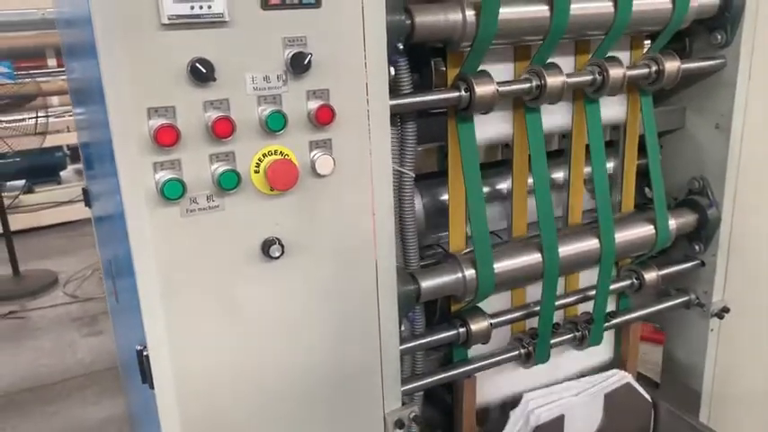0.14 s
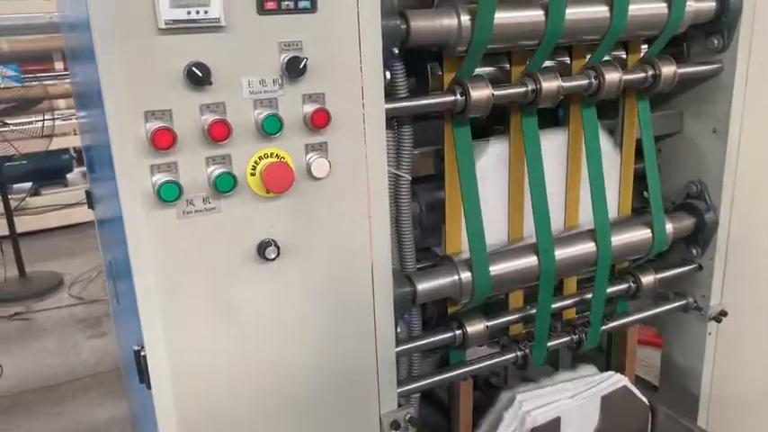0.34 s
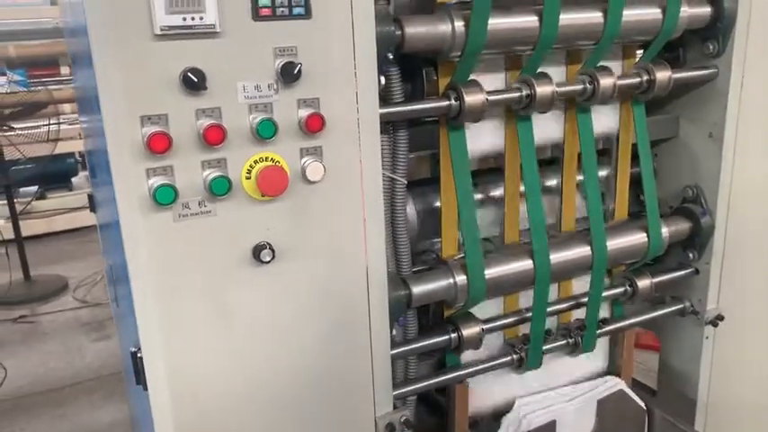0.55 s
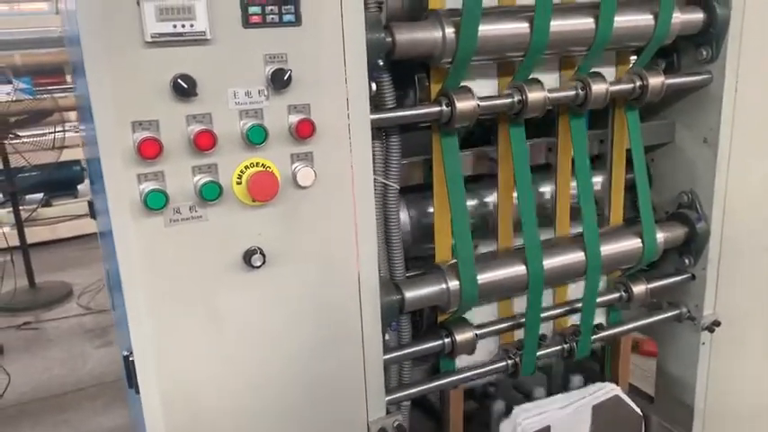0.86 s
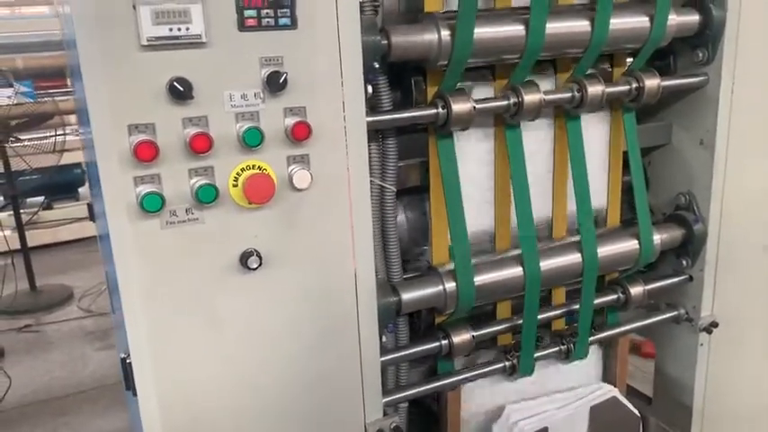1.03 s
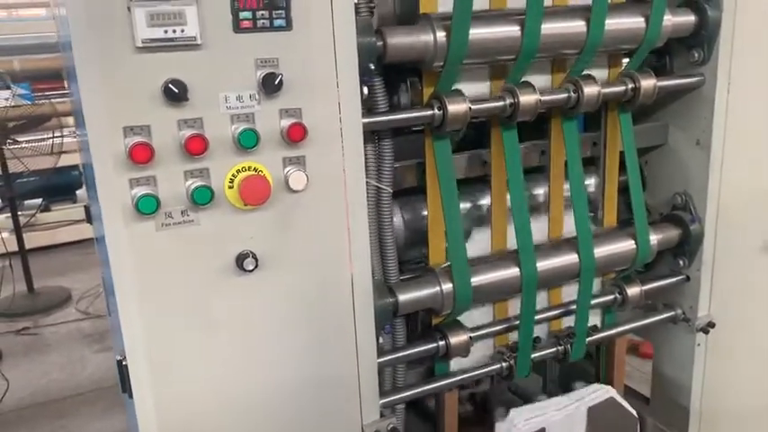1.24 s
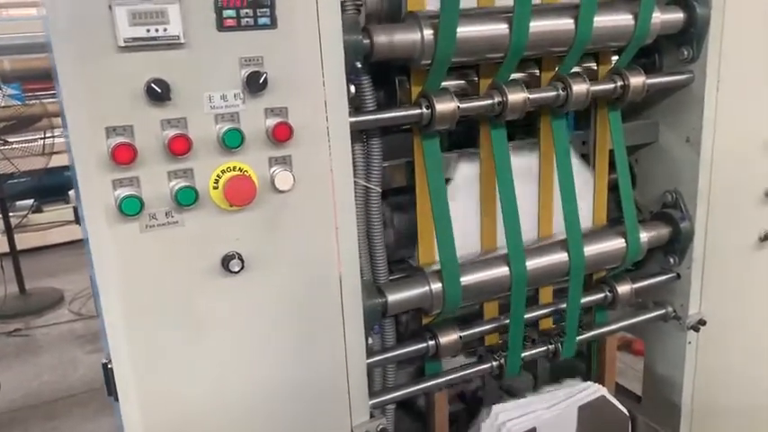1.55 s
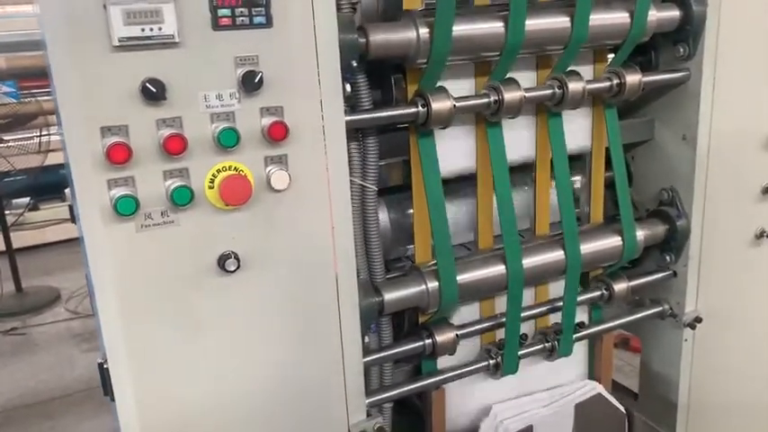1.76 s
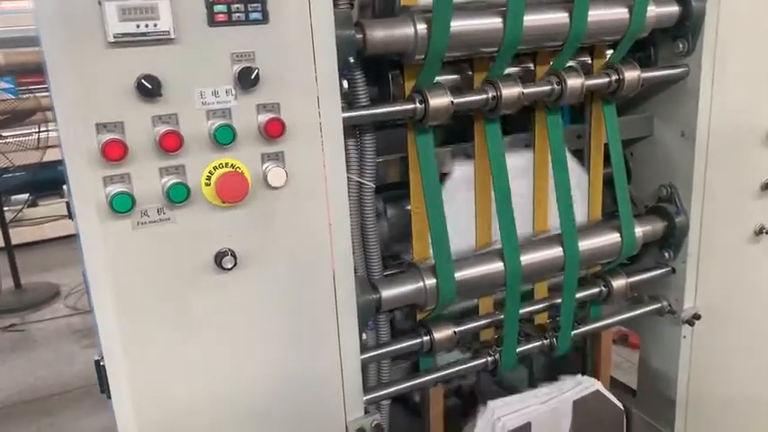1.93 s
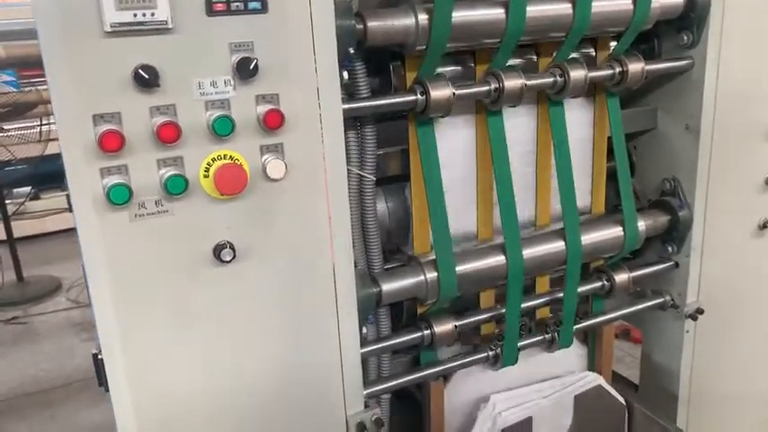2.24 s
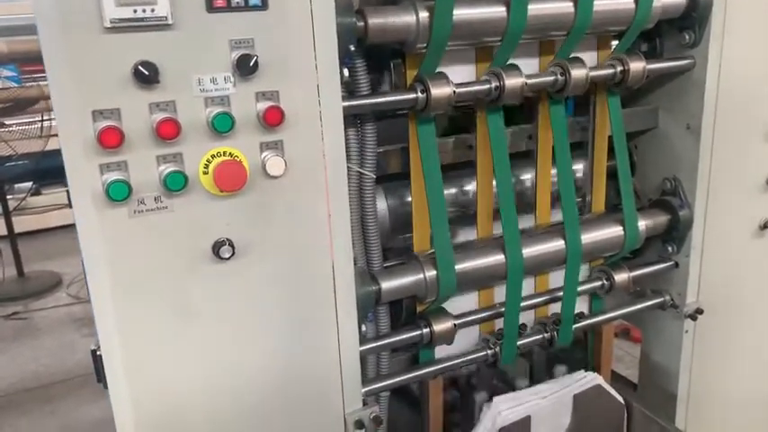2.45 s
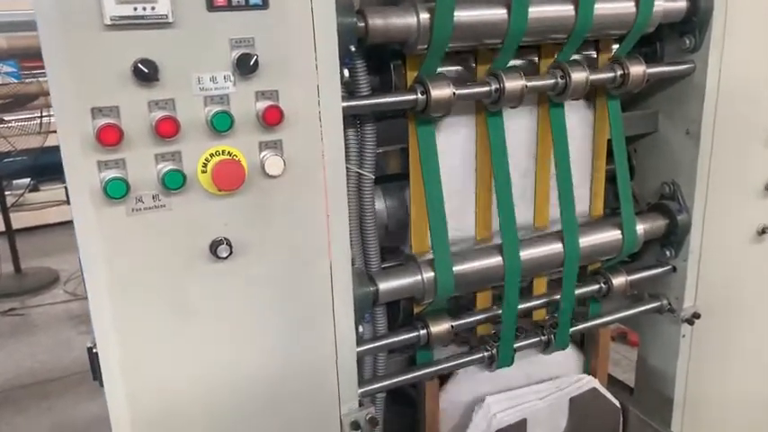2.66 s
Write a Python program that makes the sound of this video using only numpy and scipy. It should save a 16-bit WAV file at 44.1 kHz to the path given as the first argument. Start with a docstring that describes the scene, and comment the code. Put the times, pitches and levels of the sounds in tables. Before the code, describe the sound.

Paper bag machine clacking fast in a repeating three-beat metallic rhythm over steady motor drone

```python
"""Three steel cam parts of a paper bag machine clack in turn, about every 0.4 s each: damped modes
rung by a first contact, a blow and bounces, each with a burst of loose rattle.
Shaped noise gives the drone of motors, belts and rollers, rough gear hums and suction hiss;
wavering sines give motor tones, noise on a wandering carrier the whistle, decaying sines the rustle.
The hall answers every clack with decaying noise."""
import sys
import numpy as np
from scipy import signal
from scipy.fft import rfft, irfft, next_fast_len
from scipy.io import wavfile
from scipy.ndimage import uniform_filter1d, map_coordinates

SR = 44100
rng = np.random.default_rng(int(sys.argv[2]) if len(sys.argv) > 2 else 0)


def dump_mix(stems):
    """Bounce the given channels to the path in sys.argv[1] as a 16-bit WAV at rate SR."""
    frames = np.atleast_2d(stems).T  # one column per channel
    limited = np.clip(frames, -1, 1)  # hard clip at full scale
    pcm = np.round(limited * 32767).astype(np.int16)
    wavfile.write(sys.argv[1], SR, pcm)


N = 123039


def amp(db):
    """Decibels to amplitude ratio: 20 dB is a factor of ten."""
    return 10 ** (np.asarray(db) / 20)


def unit(x):
    """Normalisation to a root-mean-square value of 1."""
    return x / np.sqrt(np.mean(x ** 2) + 1e-20)


def along(points, hz):
    """Interpolation of (frequency, value) points on a logarithmic frequency axis."""
    f, v = np.transpose(points)
    return np.interp(np.log(hz + 1), np.log(f + 1), v)


def wobble(rate):
    """Band-limited random modulation: a smooth curve through `rate` random knots a second."""
    knots = rng.standard_normal(int(N * rate / SR) + 4)
    return map_coordinates(knots, [np.arange(N) * rate / SR])


def filtered(x, response):
    """Linear filtering: the spectrum of x times a response of frequency."""
    m = next_fast_len(N + SR // 2)
    spectrum = rfft(x, m) * response(np.fft.rfftfreq(m, 1 / SR))
    return irfft(spectrum, m)[..., :N]


def rush(gain, patchy_db):
    """Turbulence as filtered noise: rms 1, patchy in time and frequency, partly coherent in stereo."""
    # likeness of left and right: frequency_hz, correlation (-1 to 1)
    likeness = [(60, 1), (270, 0.96), (520, 0.59), (1100, 0.94), (1600, 0.3), (3000, 0.026), (5400, 0.33),
                (6200, -0.97), (12000, -0.13)]
    z = signal.stft(rng.standard_normal((2, N)), nperseg=512)[2]
    field = rng.standard_normal(z.shape[1:])
    field = uniform_filter1d(uniform_filter1d(field, 4, 0), 10, 1)
    pair = signal.istft(z * amp(patchy_db * unit(field)), nperseg=512)[1][:, :N]

    def mid_side_gain(hz):
        # cos^2 - sin^2 of this angle is the correlation
        angle = np.arccos(np.clip(along(likeness, hz), -1, 1)) / 2
        return gain(hz) * np.array([np.cos(angle), np.sin(angle)])

    mid, side = filtered(pair, mid_side_gain)
    return unit(np.array([mid + side, mid - side]))


def rustle():
    """Impulsive excitation: sheets and rollers tick and ping as clumps of decaying sine grains."""
    grains_per_s, centre_hz = 500, 2900
    least_db, spread_db, clump_db = -38.5, 2.6, 3.5
    shortest_cycles, longest_cycles = 2, 10  # cycles to fall to 1/e
    place, size, pitch, pan, life = rng.random((int(grains_per_s * N / SR), 5)).T
    t = np.arange(SR // 50) / SR
    hz = (centre_hz * 2 ** (1.6 * (pitch - .5)))[:, None]
    # squaring favours short grains
    cycles = (shortest_cycles * (longest_cycles / shortest_cycles) ** life ** 2)[:, None]
    start = (place * N).astype(int)
    # exponentially spread levels; neighbours swell together
    db = least_db - spread_db * np.log(1 - size) + clump_db * wobble(25)[start]
    grains = amp(db)[:, None] * np.sin(2 * np.pi * hz * t) * np.exp(-hz * t / cycles)
    at = (start[:, None] + np.arange(len(t))).ravel()
    ears = []
    for share in (pan, 1 - pan):
        panned = grains * np.sqrt(share)[:, None]
        ears.append(np.bincount(at, panned.ravel(), N)[:N])
    return np.array(ears)


def hiss():
    """Turbulent flow noise: suction air through the belts, its level unsteady."""
    # hiss spectrum: frequency_hz, relative level_db per Hz
    spectrum = [(3500, -85), (4600, 2.5), (5500, -7.5), (6600, -4), (8000, 7), (8600, -5.5), (10500, -5.5),
                (11700, 0), (12200, -13)]
    points = [(2500, -56)] + spectrum
    level = amp(-38 + 2.4 * wobble(12.6))
    return level * rush(lambda hz: amp(along(points, hz)), patchy_db=1.5)


def whistle():
    """Aeroacoustic tone at a gap: narrow-band noise carried on a wavering pitch."""
    # course of the whistle: time_s, level_db, pitch_hz
    course = [(0.0, -38, 6240), (0.061, -36, 5990), (0.45, -42.5, 5990), (0.59, -38.5, 6070),
              (0.888, -42, 5960), (1.33, -39, 5980), (1.5, -41, 6030), (1.9, -40.5, 6050),
              (2.22, -39.5, 5920), (2.32, -46, 6290), (2.52, -41, 5930), (2.79, -39.5, 6080)]
    noise_knots_per_s = 430  # sets the breadth of the tone
    s, db, pitch = np.transpose(course)
    t = np.arange(N) / SR
    phase = 2 * np.pi * np.cumsum(np.interp(t, s, pitch) + 70 * wobble(60)) / SR
    ears = []
    for ear in range(2):
        in_phase = wobble(noise_knots_per_s) * np.cos(phase)
        quadrature = wobble(noise_knots_per_s) * np.sin(phase)
        ears.append(in_phase + quadrature)
    level = amp(np.interp(t, s, db) + 3.5 * wobble(45))
    return level * unit(np.array(ears))


def drone():
    """Broadband machine noise: the drone of motors, belts and rollers as shaped noise."""
    # drone spectrum: frequency_hz, relative level_db per Hz
    spectrum = [(25, -23), (45, -20.5), (70, -6), (85, -17), (115, -12), (160, -0.5), (230, -5),
                (300, -11.5), (450, -12), (540, -18.5), (620, -11), (850, -8), (1100, -15), (1500, -20),
                (2500, -22.5), (3400, -28), (4000, -27.5), (4600, -45)]
    points = spectrum + [(6000, -47.5)]
    level = amp(-21.5 + 0.11 * wobble(7.8))
    return level * rush(lambda hz: amp(along(points, hz)), patchy_db=1.5)


def gear_hums():
    """Narrow-band noise: each rough hum has a resonance-shaped band and swells and sinks by itself."""
    # rough gear hums: centre_hz, width_hz, level_db
    hums = [(157, 16, -32), (439, 30, -45), (577, 35, -39.5), (645.5, 16, -47), (757, 51, -35),
            (855.7, 36, -36.5), (961, 30, -36), (1262.5, 43, -38), (4140, 150, -45.5)]
    total = 0
    for centre, width, db in hums:
        level = amp(db + 1.3 * wobble(9))
        total = total + level * rush(lambda hz: 1 / (1 + (2 * (hz - centre) / width) ** 2), patchy_db=1)
    return total


def steady_tones():
    """Periodic rotation: motor and gear tones as sines with small random frequency and level modulation."""
    # tones of motors and gears: pitch_hz, level_db (rms), drift_hz, sway_db
    tones = [(49.8, -34.5, 0.58, -2), (110.8, -40.5, 3.4, -2), (271, -37.5, 4.08, 2.5)]
    t = np.arange(N) / SR
    total = 0
    for hz, db, drift_hz, sway_db in tones:
        level = amp(db + sway_db * wobble(6.23)) * np.sqrt(2)
        turns = hz * t + rng.random() + drift_hz * np.cumsum(wobble(30)) / SR
        total = total + level * np.sin(2 * np.pi * turns)
    return total


def hall(x):
    """Reverberation: convolution with noise whose every frequency decays at its own speed."""
    # reverberation time: frequency_hz, t60_s
    decay = [(800, 0.3), (2500, 0.23), (10000, 0.063)]
    hz, t, z = signal.stft(rng.standard_normal((2, SR // 3)), SR, nperseg=256)
    tail = signal.istft(z * amp(-60 * t / along(decay, hz)[:, None]), SR, nperseg=256)[1]
    tail = tail / np.linalg.norm(tail[0])
    late = np.pad(x, ((0, 0), (260, 0)))  # delay in samples
    return signal.fftconvolve(late, tail, axes=1)[:, :x.shape[1]]


def cam(blows, ring, first_s, bounces, rattle_db, rattle_t60_s, lead_s):
    """Modal excitation: contacts ring damped modes, each with loose rattle; the hall answers each stroke."""
    swell_s = .0015    # time constant of each mode's swell as the contact closes
    scatter_s = .002   # the modes of one contact start up to this far apart
    clear_blur, rattle_blur = 0.79, 2.4  # factors on the mode widths
    rattle_apart, chatter_db, hall_db = 1.0, 4.5, -13.5
    size = SR // 2
    t = np.arange(SR // 5) / SR
    hz = np.fft.rfftfreq(size, 1 / SR)
    out = np.zeros((2, N + SR))

    def modes(blur):
        responses = []
        for k, (centre, width, _, _) in enumerate(ring):
            resonance = centre * centre - hz * hz + 1j * hz * width * blur
            responses.append((-1) ** k * 1j * hz * SR / (2 * np.pi) / resonance)
        return np.array(responses)

    def delay(seconds):
        return np.exp(-2j * np.pi * hz * seconds)

    swell = np.array([1 / (1 + 2j * np.pi * (hz - centre) * swell_s) for centre, *_ in ring])
    clear, blurred = modes(clear_blur) * swell, modes(rattle_blur)
    # left leads right by lead_s, centred on a delay of 1 ms
    ear_delay = delay(.001 - lead_s / 2 * np.array([[1], [-1]]))
    # time_s after the first contact, level_db, ring column of starting sizes
    contacts = [(0, 0, 2), (first_s, 0, 3)]
    contacts += [(first_s + after, db, 3) for after, db in bounces]
    for s, db in blows:
        stroke = 0
        for at, level, column in contacts:
            envelope = amp(chatter_db * wobble(600)[:len(t)] - 60 * t / rattle_t60_s)
            envelope = envelope * (1 - np.exp(-t / (3 * swell_s)))
            near, *apart = rng.standard_normal((3, len(t))) * envelope
            # one noise common to both ears plus one for each ear
            burst = (near + rattle_apart * np.array(apart)) / np.linalg.norm(near)
            loose = rfft(amp(rattle_db) * burst, size)
            gains = amp([row[column] + rng.normal(0, 1.2) for row in ring])
            scattered = clear * delay(scatter_s * rng.random((len(ring), 1)))
            contact = gains @ scattered + loose * (gains @ blurred)
            stroke = stroke + amp(level) * contact * delay(at)
        stroke = irfft(stroke * ear_delay, size)
        start = round((s - first_s - .0016) * SR)
        out[:, start:start + size] += amp(db) * (stroke + amp(hall_db) * hall(stroke))
    return out[:, :N]


def gripper():
    """Impact of the gripper: its modes ring with a broad upper part, then three faint bounces."""
    # blows: start_s, level_db
    blows = [(0.244, -7), (0.6401, -6.5), (1.0332, -7), (1.4285, -7.5), (1.823, -7), (2.2154, -7.5),
             (2.6094, -6)]
    # modes of the part: mode_hz, width_hz (before blur), first_contact_db, blow_db
    ring = [(1127, 109, -3.5, -10.5), (1840, 120, -17.5, -8.5), (2260, 150, -11, -17),
            (2533, 55, -12, -8.5), (2920, 150, -28, -24.5), (3250, 53, -27.5, -19.5),
            (3830, 70, -18.5, -21), (3760, 70, -16, -18), (4286, 140, -22.5, -11.5), (4940, 1060, -3, -8.5),
            (6430, 340, -11, -10), (9300, 1230, -9, -8), (10250, 1300, -5, -25.5)]
    # bounces: after_blow_s, level_db
    bounces = [(.0035, -21), (.009, -39), (0.019, -40)]
    return cam(blows, ring, first_s=.0125, bounces=bounces, rattle_db=4, rattle_t60_s=.08, lead_s=4e-5)


def tucker():
    """Impact of the tucker: its modes ring, with a strong first bounce and the longest rattle."""
    # blows: start_s, level_db
    blows = [(0.3344, -7), (0.73, -6.5), (1.1251, -6), (1.5189, -7.5), (1.9127, -6.5), (2.3055, -6.5),
             (2.6986, -6.5)]
    # modes of the part: mode_hz, width_hz (before blur), first_contact_db, blow_db
    ring = [(1097, 63, -15.5, -10.5), (1550, 93, -14, -9), (1676, 115, -14, -7), (1836, 102, -15, -7),
            (2037, 107, -12, -11.5), (2420, 90, -26, -15), (2580, 40, -30, -25), (2914, 95, -18.5, -21),
            (3630, 106, -19.5, -18.5), (6300, 320, -57, -16), (9160, 900, -17.5, -34.5)]
    # bounces: after_blow_s, level_db
    bounces = [(.0075, -6.5), (0.016, -17), (.023, -23)]
    return cam(blows, ring, first_s=.0115, bounces=bounces, rattle_db=5, rattle_t60_s=.09, lead_s=3e-5)


def knife():
    """Impact of the knife: its modes ring, with two strong early bounces and the shortest rattle."""
    # blows: start_s, level_db
    blows = [(0.0284, -3.5), (0.4214, -4), (0.817, -3), (1.2121, -2), (1.6072, -3), (1.9991, -3),
             (2.391, -1.5), (2.7854, -2)]
    # modes of the part: mode_hz, width_hz (before blur), first_contact_db, blow_db
    ring = [(1400, 150, -14, -12), (1680, 90, -16, -13), (1900, 130, -17, -7), (2055, 120, -19, -3.5),
            (2533, 50, -22, -19), (2940, 130, -24, -13), (3480, 120, -24, -14), (3740, 160, -22, -12),
            (4100, 200, -26, -22), (6400, 360, -20, -20), (8700, 490, -25, -22)]
    # bounces: after_blow_s, level_db
    bounces = [(.0015, -5), (.0035, -5), (.009, -20)]
    return cam(blows, ring, first_s=.0098, bounces=bounces, rattle_db=2, rattle_t60_s=.05, lead_s=7e-5)


def scene():
    """Superposition: the sound pressures of all sources add."""
    air = hiss() + whistle()
    drive = drone() + gear_hums() + steady_tones()
    clacks = gripper() + tucker() + knife()
    return rustle() + air + drive + clacks


def record(dry):
    """Stereo colouring by linear filters: left-right balance, separate mid and side gains, a band limit."""
    # balance of left and right: frequency_hz, left_minus_right_db
    balance = [(50, 0.8), (130, -3.5), (400, -2.5), (1200, 0), (2200, -0.5), (3500, -2.5), (6000, -3.5),
               (7000, 1)]
    # gain of what is alike in the two ears: frequency_hz, gain_db
    mid_gain = [(6400, -0.76), (6900, -9.5), (7300, -59), (7600, -7), (7900, 1), (8600, 9), (10200, 8),
                (10600, 1), (11100, -20.5), (12200, -75)]
    # gain of what is opposed in the two ears: frequency_hz, gain_db
    side_gain = [(6400, -0.6), (6900, 6), (7600, -15), (8100, 3), (8400, -30), (9200, -23), (10000, -33),
                 (10500, 4), (11100, 1.5)]
    top_hz = 12225
    halves = np.array([[.5], [-.5]])
    left, right = filtered(dry, lambda hz: amp(along(balance, hz) * halves))
    mid_side = np.array([left + right, left - right]) / 2
    mid, side = filtered(mid_side, lambda hz: amp([along(mid_gain, hz), along(side_gain, hz)]))
    return filtered(np.array([mid + side, mid - side]), lambda hz: hz < top_hz)


dry = scene()
out = record(dry)
dump_mix(out)
```